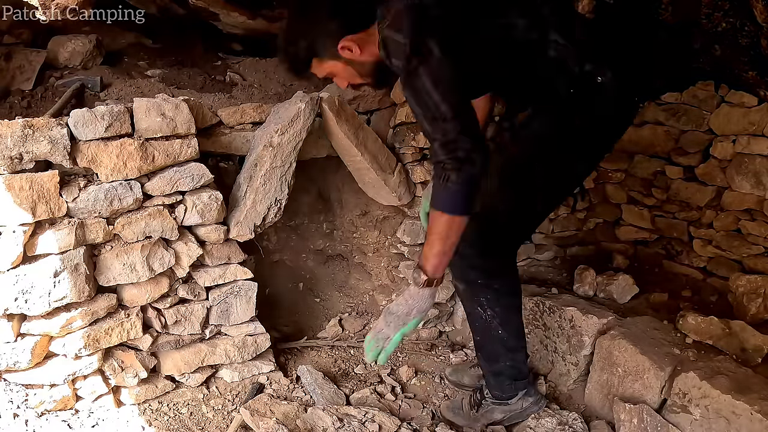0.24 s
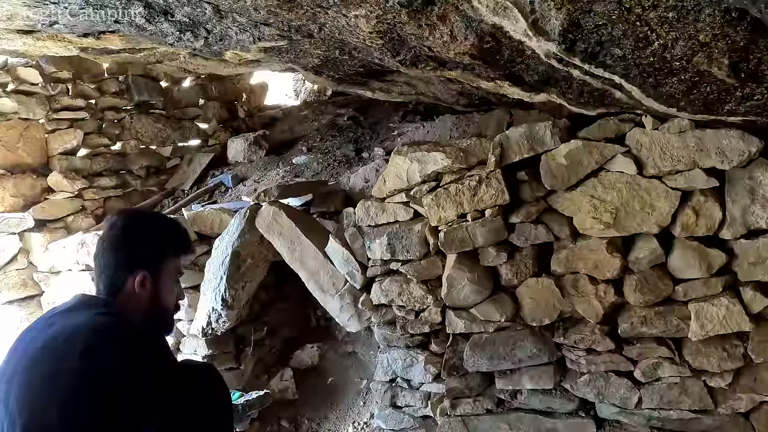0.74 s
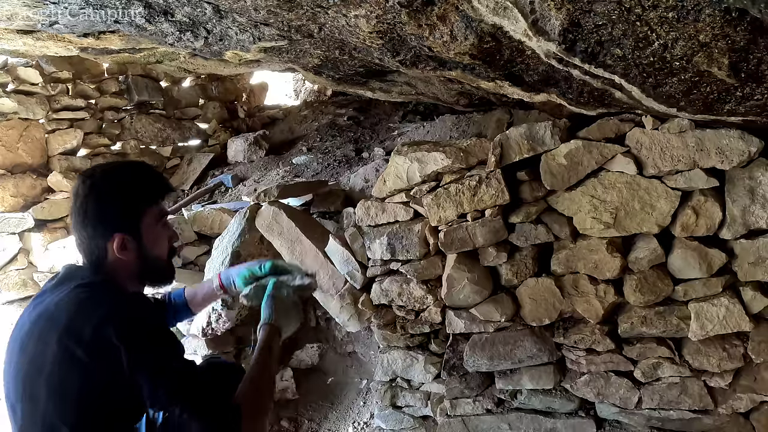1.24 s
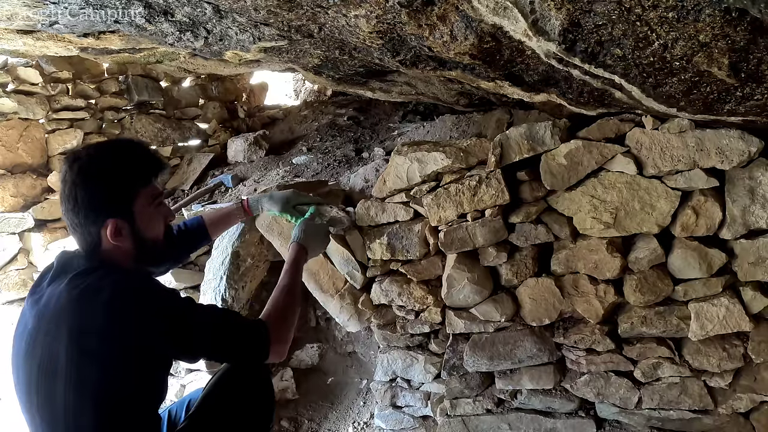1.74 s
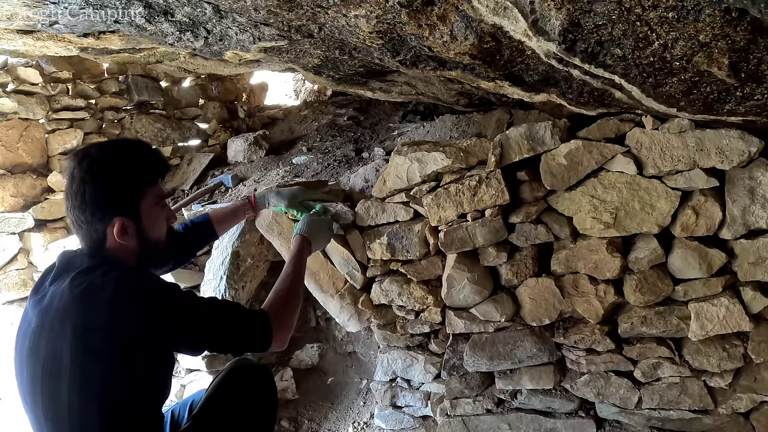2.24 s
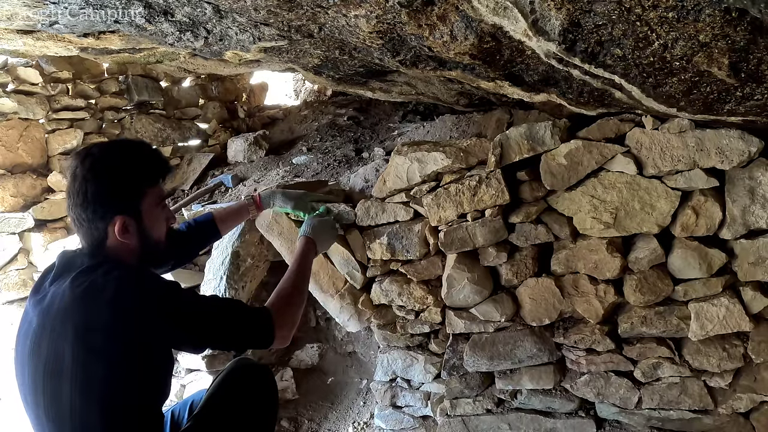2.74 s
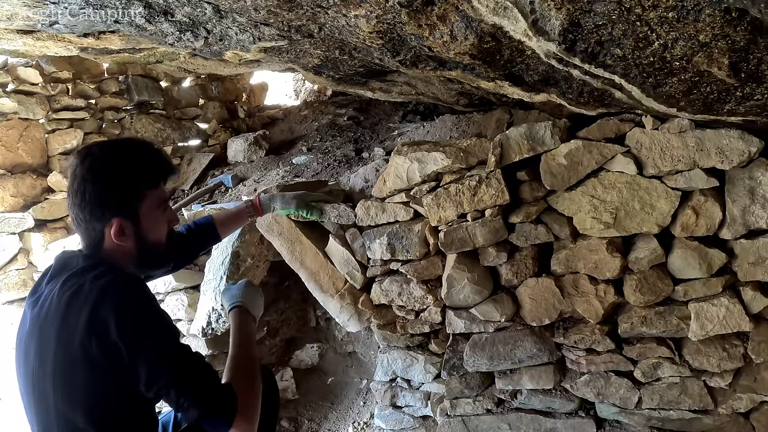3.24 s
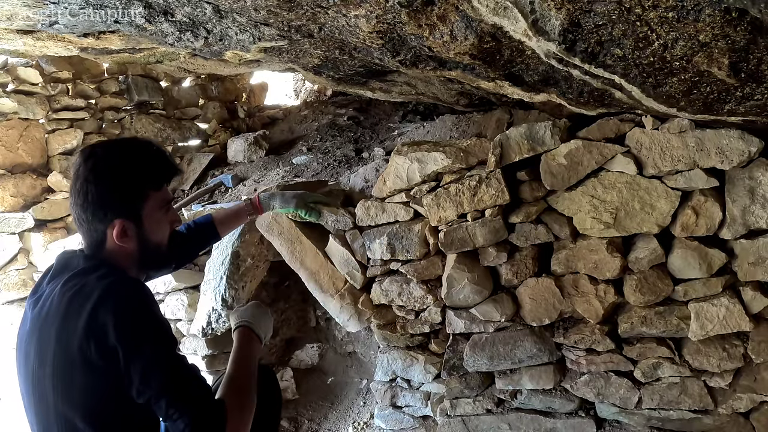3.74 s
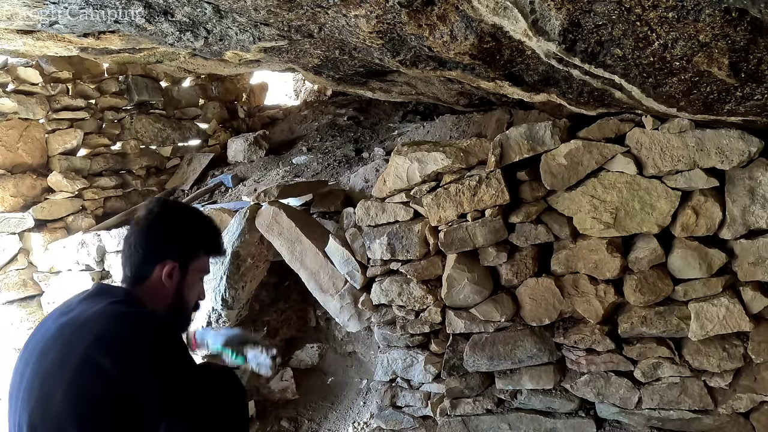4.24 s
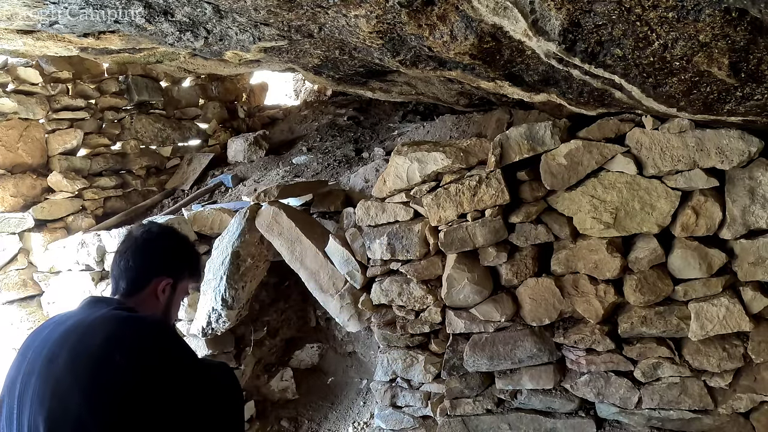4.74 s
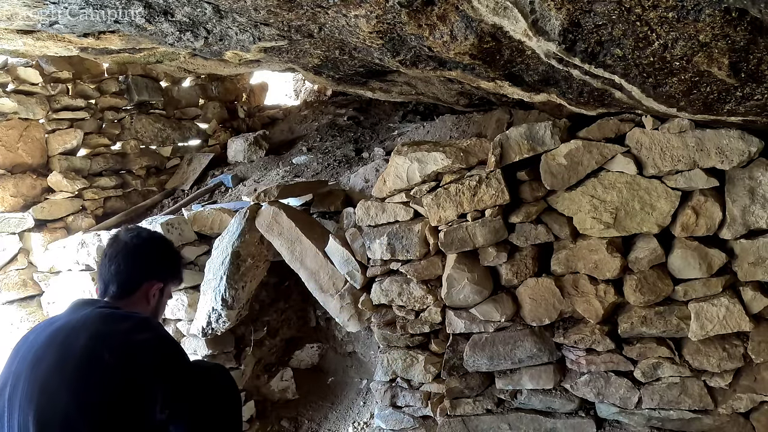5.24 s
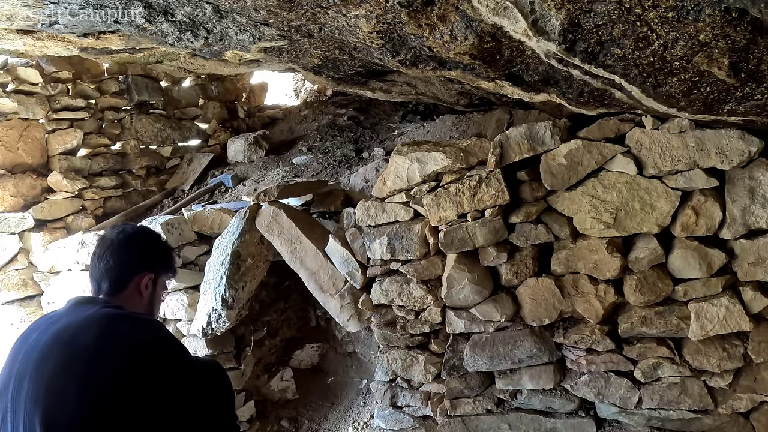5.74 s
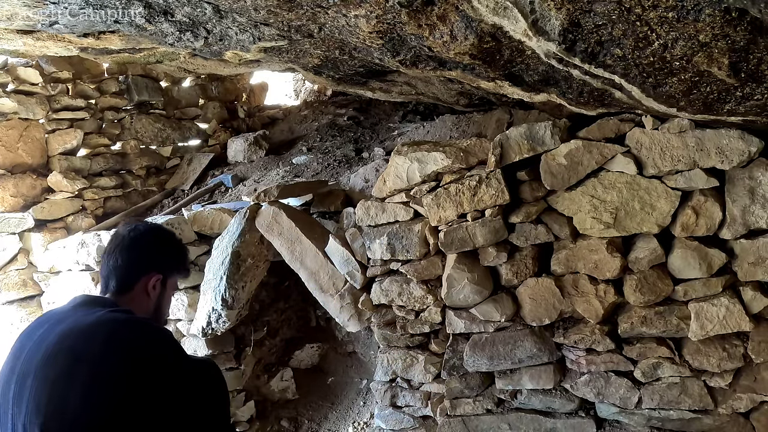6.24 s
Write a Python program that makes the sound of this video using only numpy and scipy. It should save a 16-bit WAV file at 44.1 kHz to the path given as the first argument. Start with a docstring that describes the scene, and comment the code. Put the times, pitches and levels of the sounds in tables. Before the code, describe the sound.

Stones are handled a couple of metres away under a low rock overhang, with very little echo. For the first 0.7 seconds loose stones clack and thud, with one bright, sharp clack at 0.3 seconds. Two small dry pops sound right at the microphone at about 0.6 and 1.2 seconds, and a much louder one at 1.9. Between them and afterwards, sleeves and gloves rustle faintly, a boot scuffs and grit ticks. A few light knocks come around 3.6 seconds. From 4.1 the rubbing grows, and from 4.8 to 5.1 a flat slab knocks and rocks while a thin flake chatters with high clinks. The slab strikes hard at 5.8 and 5.9 seconds, ringing briefly, then lands with a firm clack and thud at 6.3. Soft puffs of air rumble on the microphone, mostly at the start and near the end.

```python
"""Loose stones clack and thud as they are picked up and set into a dry wall under a low rock overhang,
a couple of metres away. Later a flat slab knocks, rings and lands hard, and a thin flake chatters.
Each impact excites damped modes of the stone, its weight drives the ground, and the rock scatters
the sound back. Friction makes sleeves and gloves rustle and a boot scuff in grit; air rumbles
softly through the shelter, and three dry pops sound very close."""
import sys
import numpy as np
from scipy import signal
from scipy.fft import rfft, irfft
from scipy.io import wavfile
from scipy.ndimage import uniform_filter1d

SR = 44100
rng = np.random.default_rng(int(sys.argv[2]) if len(sys.argv) > 2 else 0)


def generate_wav(sig):
    """Save sig (samples, or channels by samples) to the path in sys.argv[1] as 16-bit PCM at SR."""
    pcm = np.round(np.clip(np.atleast_2d(sig).T, -1, 1) * 32767).astype(np.int16)
    wavfile.write(sys.argv[1], SR, pcm)


N = 285327
BLOW_S = np.arange(-256, 16128) / SR  # time axis of one impact, with contact at zero
AGE_S = np.maximum(BLOW_S, 0)

def undb(db):
    """Amplitude ratio of a level in decibels."""
    return 10 ** (np.asarray(db) / 20)

def unit(x):
    """Normalisation to an rms of 1."""
    return x / np.sqrt(np.mean(x ** 2))

def tint(x, points):
    """Spectral shaping by a curve through (frequency_hz, gain_db) points."""
    hz, db = np.transpose(points)
    f = np.fft.rfftfreq(x.shape[-1], 1 / SR)
    gain = undb(np.interp(np.log(f + 1), np.log(hz), db))
    return irfft(rfft(x) * gain, x.shape[-1])

def resonance(hz, db, width):
    """A broad resonance as spectral points; its width is a share of its pitch."""
    return [(hz / (1 + width), 0), (hz, db), (hz * (1 + width), 0)]

def noise(size, points, side_db):
    """Partly coherent stereo noise: the weaker the side signal, the more alike the ears."""
    mid, side = tint(rng.standard_normal((2, size)), points)
    return unit(mid + undb(side_db) * side * np.array([[1], [-1]]))

def wander(rate_hz):
    """Smooth random modulation with an rms of 1."""
    hold = int(SR / rate_hz)
    steps = rng.standard_normal(N)[np.arange(N) // hold]
    return unit(uniform_filter1d(steps, hold))

def fade(t60_s):
    """Exponential damping: 60 dB in t60_s."""
    return np.exp(-np.log(1000) * AGE_S / max(t60_s, .004))

def swell(rise_s):
    """Onset of a contact whose force builds over a finite time."""
    return 1 - np.exp(-(AGE_S / rise_s) ** 2)

def band_db(x, low_hz, high_hz):
    """Band level of an impact, its energy spread over 25 ms."""
    f = np.fft.rfftfreq(len(BLOW_S), 1 / SR)
    band = rfft(x.mean(axis=0))[(f > low_hz) & (f < high_hz)]
    energy = 2 * np.sum(np.abs(band) ** 2) / len(BLOW_S)
    return 10 * np.log10(energy / (.025 * SR))

def add(track, start_s, blow):
    """Superposition of one impact on the track."""
    start = int((start_s + BLOW_S[0]) * SR)
    a, b = max(start, 0), min(start + len(BLOW_S), N)
    track[:, a:b] += blow[:, a - start:b - start]

def movement(rows, attack_s, release_s, rest_db, arch_db=0):
    """Incoherent sources add in power: movements over a resting level, arch_db weaker at each end."""
    t = np.arange(N) / SR
    power = undb(rest_db) ** 2
    for start_s, length_s, db in rows:
        onset = np.clip((t - start_s) / attack_s, 0, 1)
        decay = np.exp(-np.maximum(t - start_s - length_s, 0) / release_s)
        arch = (2 * np.clip((t - start_s) / length_s, 0, 1) - 1) ** 2
        power = power + (undb(db - arch_db * arch) * onset * decay) ** 2
    return np.sqrt(power)

# spectrum of moving air: frequency_hz, gain_db
AIR_SPECTRUM = [(10, -14), (30, 2), (40, -2.5), (55, -21), (100, -22.5), (300, -67)]
# puffs of air: start_s, length_s, relative_level_db
AIR_PUFFS = [(0.07, 0.06, -33.5), (0.58, 0.24, -58.5), (2.02, 0.85, -61), (3.55, 0.28, -53),
             (4.18, 0.43, -55), (4.72, 0.16, -53), (5.48, 0.57, -59), (5.92, 0.18, -42), (6.1, 0.33, -46)]

def air():
    """Turbulence: puffs of air on the microphone make a low rumble."""
    puffs = movement(AIR_PUFFS, attack_s=0.017, release_s=0.029, rest_db=-71)
    return noise(N, AIR_SPECTRUM, side_db=-12.5) * puffs * undb(-1)

# response of the hollow ground: frequency_hz, gain_db
HOLLOW_SPECTRUM = [(60, -5), (110, -20.5), (165, 5), (210, -1), (290, -9.5), (500, -18.5), (900, -27.5),
                   (2000, -53.5)]
# shifts of weight: start_s, length_s, relative_level_db
WEIGHT_SHIFTS = [(0.06, 0.16, -61.5), (0.48, 0.15, -54), (1.03, 0.036, -58), (2.0, 0.014, -57.5),
                 (2.48, 0.15, -63.5), (2.77, 0.02, -62.5), (3.54, 0.19, -59.5), (4.2, 0.2, -67.5),
                 (4.44, 0.04, -63), (4.78, 0.23, -56.5), (5.27, 0.018, -62.5), (5.42, 0.079, -56.5),
                 (5.52, 0.52, -60), (6.15, 0.35, -64)]

def boots():
    """Forced vibration: shuffling feet drive the low resonance of the hollow ground."""
    shifts = movement(WEIGHT_SHIFTS, attack_s=0.015, release_s=0.052, rest_db=-73.5)
    return noise(N, HOLLOW_SPECTRUM, side_db=-5.0) * shifts * undb(2.5 + 3 * wander(24))

def grit(grains_per_s=220, size_spread_db=10.5):
    """Stick-slip friction: grains break loose in bursts, each with a tiny crack."""
    signs = rng.choice([-1, 1], N)
    sizes = undb(size_spread_db * np.minimum(rng.exponential(size=N), 3))
    slip = undb(3.8 * wander(22))
    grains = (rng.random(N) < slip * grains_per_s / SR) * signs * sizes
    return unit(signal.fftconvolve(grains[None], crack(0.017), axes=1)[:, :N])

# spectra of rubbing cloth and of its fine hiss: frequency_hz, gain_db
CLOTH_SPECTRUM = [(300, -28), (880, -10.5), (1120, 3), (1280, 2.5), (1600, -0.5), (1900, -5), (2450, -5.5),
                  (3500, -8), (5000, -16), (9000, -30.5), (15000, -57)]
HISS_SPECTRUM = [(500, -3.5), (3500, -13.5), (5200, 1), (7800, 2), (8600, -2), (9400, -16.5),
                 (12000, -15.5), (15500, -45.5)]
# sleeve, glove or boot sliding over stone: start_s, length_s, relative_rub_db, relative_hiss_db
FRICTION_STROKES = [(0.0, 0.24, -60, -59), (0.453, 0.16, -63, -74), (0.799, 0.095, -69, -67.5),
                    (1.014, 0.07, -62.5, -63), (1.073, 0.091, -63.5, -71), (1.175, 0.32, -58, -68),
                    (1.356, 0.066, -56, -65), (1.441, 0.3, -66, -68.5), (1.86, 0.3, -66.5, -73),
                    (1.973, 0.12, -65, -72), (2.453, 0.54, -74.5, -73), (2.913, 0.051, -65.5, -63),
                    (3.465, 0.11, -65, -88), (3.808, 0.084, -70.5, -64), (3.963, 0.64, -65.5, -67),
                    (4.072, 0.13, -57.5, -67), (4.177, 0.036, -52, -74), (4.354, 0.085, -60.5, -76),
                    (4.497, 0.1, -60, -58), (4.581, 0.069, -55.5, -63), (4.709, 0.31, -56, -64.5),
                    (5.072, 0.1, -60, -67.5), (5.249, 0.12, -58.5, -63.5), (5.433, 0.076, -55, -62),
                    (5.533, 0.095, -57.5, -68), (5.657, 0.1, -55.5, -58.5), (5.827, 0.32, -60, -68.5),
                    (6.162, 0.24, -59.5, -64)]

def rustle():
    """Friction noise grows with sliding speed, so each gritty stroke is loudest midway."""
    strokes = np.array(FRICTION_STROKES)
    shape = dict(attack_s=0.019, release_s=0.039, arch_db=4)
    rub_gain = movement(strokes[:, [0, 1, 2]], rest_db=-77.5, **shape)
    hiss_gain = movement(strokes[:, [0, 1, 3]], rest_db=-76, **shape)
    crackle = undb(-7) * grit()
    cloth = noise(N, CLOTH_SPECTRUM, side_db=-8.5) * undb(2.63 * wander(45))
    hiss = noise(N, HISS_SPECTRUM, side_db=-12.5) * undb(1.75 * wander(45))
    return undb(-1.5) * ((cloth + crackle) * rub_gain + hiss * hiss_gain)

# the glove catching on rough stone: start_s, relative_level_db
GLOVE_SNAGS = [(1.042, -57), (1.097, -56), (1.235, -64), (2.133, -62), (2.954, -59), (4.093, -61),
               (4.211, -62), (5.481, -56), (5.596, -61)]

def scratches(rise_s=0.0022, t60_s=0.037):
    """A single stick-slip event: the glove snags and slips free with a dry rasp."""
    out = np.zeros((2, N))
    for start_s, db in GLOVE_SNAGS:
        hiss = noise(len(BLOW_S), HISS_SPECTRUM, side_db=-26)
        scrape = undb(-2) * noise(len(BLOW_S), STONE_SPECTRUM, side_db=-16)
        add(out, start_s, undb(db + 4) * (hiss + scrape) * swell(rise_s) * fade(t60_s))
    return out

# dry pops right at the microphone: start_s, relative_level_db, snap_s
CLOSE_POPS = [(0.623, -34.5, 0.00015), (1.221, -38, 0.0011), (1.9275, -17.5, 0.00013)]

def pops(sag_hz=150, swing_hz=38):
    """A pressure transient with no echo: a snap, a quick sag and a slow swing back."""
    out = np.zeros((2, N))
    sag = undb(-1) * np.sin(2 * np.pi * sag_hz * AGE_S) * fade(0.012) * swell(0.0022)
    swing = undb(-14) * np.cos(2 * np.pi * swing_hz * AGE_S) * fade(0.11) * swell(0.0022)
    pan_db = np.array([[-1], [1]])
    for start_s, db, snap_s in CLOSE_POPS:
        snap = AGE_S / snap_s * np.exp(1 - AGE_S / snap_s)
        pop = tint(snap - 2 * sag - swing, [(5000, 0), (14000, -22)])
        add(out, start_s, undb(db + pan_db) * pop)
    return out

# spectrum of snapping grit: frequency_hz, gain_db
CRUMB_SPECTRUM = [(3000, -33.5), (8000, 9.5), (15000, -11.5)]
# crumbs cracking under a stone: start_s, relative_level_db
CRUMB_SNAPS = [(.517, -47.5), (.653, -51), (2.623, -54.5), (2.89, -54.5), (3.248, -51), (3.857, -43),
               (5.656, -48.5), (6.318, -49)]

def crumbs(rise_s=0.00035, t60_s=0.042):
    """Brittle fracture: a crumb of grit gives way with a tiny, very bright tick."""
    out = np.zeros((2, N))
    for start_s, db in CRUMB_SNAPS:
        tick = noise(len(BLOW_S), CRUMB_SPECTRUM, side_db=-3) * swell(rise_s) * fade(t60_s)
        add(out, start_s, undb(db - 8) * tick)
    return out

def clink(hz, db, t60_s, spread, rise_s):
    """Beating: five close modes interfere as they decay, over a shorter rasp of the rough faces."""
    detune, phase = rng.uniform(-0.71, 1, (2, 5, 1))
    modes = np.sin(2 * np.pi * (hz * (1 + spread * detune) * AGE_S + phase))
    tone = unit(modes.sum(axis=0, keepdims=True))
    rasp = unit(tint(rng.standard_normal((1, len(BLOW_S))), resonance(hz, 40, .5)))
    x = (tone * fade(t60_s) + undb(-1) * rasp * fade(t60_s * .75)) * swell(rise_s)
    return x * undb(db - band_db(x, 0, SR))

# stones and splinters that lie free: start_s, pitch_hz, level_db, t60_s
FREE_STONE_RINGS = [(0.306, 1814, -41.5, 0.069), (.305, 9740, -41, 0.055), (3.69, 517, -48.5, 0.049),
                    (5.9136, 10300, -57.5, 0.11)]

def free_stones():
    """Free vibration: an unclamped stone rings on for a moment after a knock."""
    out = np.zeros((2, N))
    for start_s, hz, db, t60_s in FREE_STONE_RINGS:
        add(out, start_s, clink(hz, db, t60_s, spread=.045, rise_s=0.00051))
    return out

# two modes of a thin hard flake: pitch_hz, t60_s
FLAKE_RESONANCES = [(5110, 0.09), (6600, 0.074)]
# slips and blows as stones are wedged in: start_s, lower_mode_db, upper_mode_db
FLAKE_CHATTER = [(2.430, -59.5, -70.5), (2.457, -76, -90.5), (2.478, -82, -73), (2.502, -82, -90),
                 (3.489, -74.5, -87), (3.508, -70, -78.5), (3.538, -52.5, -57.5), (3.590, -68, -77),
                 (3.622, -69, -81), (3.667, -60.5, -67), (4.780, -42, -51), (4.841, -50, -43),
                 (4.899, -58, -56), (5.068, -40.5, -40.5), (5.127, -60, -54), (5.788, -43.5, -43),
                 (5.914, -39.5, -55), (6.275, -78, -66), (6.296, -55, -58), (6.342, -46, -39.5)]

def flake():
    """Selective excitation: where the flake is pinched decides which mode speaks."""
    out = np.zeros((2, N))
    for start_s, *levels_db in FLAKE_CHATTER:
        for (hz, t60_s), db in zip(FLAKE_RESONANCES, levels_db):
            add(out, start_s, clink(hz, db, t60_s, spread=.009, rise_s=0.0015))
    return out

# dense modes of rough stone: frequency_hz, gain_db
STONE_SPECTRUM = [(120, -30), (350, -14), (700, -5), (1050, -3.5), (1900, 2), (3200, 0), (4500, -4.5),
                  (6000, -6), (7700, -5), (9100, -18), (10300, -24), (11600, -27.5), (14200, -31.5),
                  (15500, -44.5)]

def crack(t60_s, rise_s=0.0033, tail_cut_db=0):
    """Modal overlap: dense, damped modes merge into noise, which the wall and rock roof scatter."""
    direct = noise(len(BLOW_S), STONE_SPECTRUM, side_db=-13.0) * swell(rise_s) * fade(t60_s)
    scatter = noise(len(BLOW_S), STONE_SPECTRUM, side_db=-6.5) * swell(0.01)
    tail = undb(-19) * fade(0.14) + undb(-44) * fade(0.46)  # near and far reflections
    return direct + scatter * tail * undb(-tail_cut_db)

def ring(modes, rise_s, detune_share=.009, scatter_db=2.0):
    """Normal modes are damped sinusoids; grip and point of contact vary them from blow to blow."""
    out = 0
    for hz, db, t60_s in modes:
        detune, loss, phase = rng.standard_normal(3)
        tone = np.sin(2 * np.pi * (hz * (1 + detune_share * detune) * AGE_S + phase))
        out = out + undb(db - scatter_db * loss) * tone * fade(t60_s)
    return out * swell(rise_s)

def contact(x, body_db, clack_db, tick_db):
    """Contact sets the band levels: a blunt face drives the low modes, a sharp edge the high ones."""
    bands = [(700, 2000, body_db), (2000, 4500, clack_db), (4500, 10000, tick_db)]
    for _ in range(2):  # twice, since each band's gain spills into its neighbours
        x = tint(x, [(np.sqrt(lo * hi), db - band_db(x, lo, hi)) for lo, hi, db in bands])
    return x

# modes of the ground under the stones: pitch_ratio, gain_db, t60_s
GROUND_RESONANCES = [(.74, -5, 0.13), (0.981, -25, 0.063), (1.261, 4, 0.059)]

def thud(db, hz, cavity_hz=178, earth_hz=78):
    """The landing weight drives the ground modes and the cavity resonance under the rock."""
    load_s = AGE_S - .007  # the weight peaks just after the contact
    ground = sum(undb(gain_db) * np.cos(2 * np.pi * hz * ratio * load_s) * fade(t60_s)
                 for ratio, gain_db, t60_s in GROUND_RESONANCES)
    cavity = undb(-17) * np.sin(2 * np.pi * (cavity_hz * AGE_S + rng.random())) * fade(0.22)
    boom = undb(-17) * noise(len(BLOW_S), HOLLOW_SPECTRUM, side_db=-21.5) * fade(0.18)
    earth = undb(-10) * np.cos(2 * np.pi * earth_hz * load_s) * fade(0.0975)
    x = tint((ground + earth + cavity + boom) * swell(0.0061), [(45, -10), (100, 0)])
    return x * undb(db - band_db(x, 40, 900))

# modes of a small stone: pitch_ratio, gain_db, t60_s
SMALL_STONE_RESONANCES = [(.83, -6.5, 0.045), (0.998, -2, 0.034), (1.128, -8.5, 0.02133)]
# loose stones and chips landing: start_s, thud_db, body_db, clack_db, tick_db, t60_s, pitch_hz
STONE_IMPACTS = [(0.003, -57.5, -46, -54.5, -50.5, 0.27, 1110), (0.038, -50, -49, -49, -42, 0.35, 8100),
                 (0.065, -41, -40, -67, -62, 0.2, 480), (0.078, -41, -39.5, -44.5, -46, 0.12, 1106),
                 (0.0906, -44, -60, -40.5, -36.5, 0.062, 7470), (0.163, -76, -51, -53.5, -48.5, 0.18, 6960),
                 (0.3051, -38, -43, -26, -33.5, 0.06, 3297), (0.323, -38.5, -51.5, -50, -53, 0.076, 800),
                 (0.431, -47.5, -55, -68, -67.5, 0.22, 753), (0.458, -50, -36.5, -43, -52.5, 0.051, 1746),
                 (0.492, -50, -49.5, -59, -72, 0.089, 895), (0.516, -75, -62, -54.5, -62, 0.07, 3620),
                 (0.551, -44.5, -50.5, -60, -81, 0.056, 964), (0.565, -57, -57, -66, -78, 0.06, 3640),
                 (0.576, -49.5, -67, -56, -62, 0.12, 3740), (0.652, -58, -68.5, -57, -59.5, 0.049, 2980),
                 (0.687, -46.5, -46.5, -51.5, -67, 0.073, 1274), (0.815, -80, -76, -81, -57, 0.13, 6750),
                 (1.023, -61, -61, -63, -76, 0.074, 1900), (1.991, -61, -57, -63.5, -63, 0.15, 1120),
                 (2.206, -56.5, -59, -85.5, -86.5, 0.23, 547), (2.378, -73, -105, -68.5, -55, 0.093, 6870),
                 (2.421, -65.5, -71.5, -75, -57, 0.1, 7100), (2.733, -81, -56, -62, -60.5, 0.31, 1350),
                 (2.779, -51.5, -61, -77, -69, 0.049, 434), (3.067, -89, -84.5, -80, -63.5, 0.14, 5210),
                 (3.248, -87, -102.5, -58, -61, 0.14, 3670), (3.665, -40, -41.5, -56.5, -75.5, 0.049, 1140),
                 (3.692, -48, -54, -72, -86, 0.056, 910), (3.857, -66, -85, -70.5, -67, 0.13, 8700),
                 (4.943, -48.5, -50, -65, -72, 0.09, 1820), (4.985, -47, -52.5, -56, -63, 0.1, 690),
                 (5.41, -53.5, -65, -63, -62.5, 0.21, 5470), (5.508, -58, -53.5, -64, -72, 0.073, 1780),
                 (5.677, -47, -46.5, -59.5, -72, 0.14, 1640), (6.3431, -72, -70, -54, -32.5, 0.073, 7260)]

def loose_stones(rise_s=0.0003, ground_hz=175.2, scatter_octaves=0.17):
    """Impulse excitation: each stone grazes, clacks at its own resonance and thuds into the ground."""
    out = np.zeros((2, N))
    for start_s, thud_db, body_db, clack_db, tick_db, t60_s, pitch_hz in STONE_IMPACTS:
        modes = [(pitch_hz * ratio, db, decay_s) for ratio, db, decay_s in SMALL_STONE_RESONANCES]
        burst = tint(crack(t60_s, rise_s), resonance(pitch_hz, db=7, width=0.46))
        ringing = undb(-1) * ring(modes, rise_s)
        clack = contact(burst + ringing, body_db, clack_db, tick_db)
        add(out, start_s, clack)
        add(out, start_s - 0.006, undb(-33) * clack)  # the graze
        thud_hz = ground_hz * 2 ** (scatter_octaves * rng.standard_normal())
        add(out, start_s + .003, thud(thud_db, thud_hz))
    return out

# modes of the flat slab: pitch_hz, gain_db, t60_s
SLAB_RESONANCES = [(996, 10, 0.049), (1270, 4.5, 0.054), (1418, 8, 0.056), (1638, 7, 0.042),
                   (1844, 3.5, 0.079), (2403, -5, 0.032), (2570, 15, 0.031), (2640, -14.5, 0.11),
                   (4960, 10, 0.044), (7860, 7, 0.05)]
# the slab landing and rocking:
# start_s, thud_db, thud_hz, body_db, clack_db, tick_db, ring_gain_db, peak_hz, rise_s
SLAB_IMPACTS = [(3.538, -45, 147, -44, -81.5, -62, -31, 1280, 0.0003),
                (3.575, -49, 129, -48.5, -53, -64.5, -26.5, 1000, 0.00042),
                (3.679, -54, 94, -55, -80, -87, -13, 995, .002),
                (4.78, -32.5, 131, -36.5, -48, -41.5, -8, 990, 0.0011),
                (4.801, -39, 111, -29.5, -51.5, -65, -9, 980, 0.0018),
                (4.831, -61, 179, -38.5, -76, -79, -27, 980, 0.0021),
                (4.843, -42.5, 151, -36, -54, -56.5, -17, 970, 0.0011),
                (4.884, -49, 139, -52, -76, -66, -14, 980, 0.0024),
                (4.895, -41, 105, -32.5, -53.5, -57.5, -10.5, 940, 0.0019),
                (4.963, -41.5, 129, -48, -60, -63, -13, 1000, 0.0012),
                (5.067, -35.5, 213, -35.5, -38.5, -47.5, -14.5, 1200, 0.0033),
                (5.127, -59, 194, -61, -53.5, -60, -19, 3200, 0.00038),
                (5.788, -32, 144, -20.5, -34, -49, -6, 1420, 0.002),
                (5.798, -73, 157, -39.5, -38, -36, -36, 2170, 0.0022),
                (5.818, -39.5, 125, -41.5, -51, -51, -12, 1440, 0.0088),
                (5.88, -39.5, 134, -46, -67, -81, -12, 990, 0.0021),
                (5.9134, -24.5, 135.7, -21, -24.5, -42, -12, 1840, 0.0016),
                (5.936, -40, 153, -40.5, -48, -59.5, -24, 1770, 0.0023),
                (5.973, -53, 200, -50, -68, -69, -15, 1000, 0.0016),
                (6.153, -44, 143, -39.5, -56.5, -71, -4, 1500, 0.00097),
                (6.206, -53, 143, -51, -89, -81, -4, 1010, 0.0013),
                (6.228, -57.5, 116, -56, -77, -63.5, -12, 980, 0.0013),
                (6.285, -47.5, 154, -41.5, -72, -67, 7, 1000, 0.0022),
                (6.309, -45, 157, -40, -54, -57, -12, 1290, 0.0011),
                (6.342, -20, 122, -25, -21.5, -37.5, -51, 2920, 0.0018),
                (6.372, -39.5, 105.1, -48.5, -55, -60, -15.5, 1390, 0.0015)]

def slab(firm_db=-30, light_t60_s=0.058, db_per_halving=29, graze_limit_db=-47.5):
    """Contact damping: a firm blow stops dead, a light one grinds on; the ring follows the crack."""
    out = np.zeros((2, N))
    for start_s, thud_db, thud_hz, body_db, clack_db, tick_db, ring_db, peak_hz, rise_s in SLAB_IMPACTS:
        t60_s = light_t60_s * 2 ** (-max(body_db - firm_db, 0) / db_per_halving)
        tail_cut_db = 0.2 * max(thud_db - firm_db, 0)  # a heavy landing pins the slab
        burst = tint(crack(t60_s, rise_s, tail_cut_db), resonance(peak_hz, db=7, width=0.59))
        ringing = undb(ring_db) * ring(SLAB_RESONANCES, rise_s * 1.75)
        knock = contact(burst + ringing, body_db, clack_db, tick_db)
        add(out, start_s, knock + thud(thud_db, thud_hz))
        # the slab first grazes its seat, lightly however hard the blow
        graze = contact(crack(0.15, rise_s=0.014), body_db, clack_db - 5, tick_db - 5)
        add(out, start_s - 0.016, undb(min(-17, graze_limit_db - body_db)) * graze)
    return out

def scene():
    """Superposition of the stones, the pops, the builder's movement and the air."""
    stones = slab() + loose_stones() + flake() + free_stones() + crumbs()
    return stones + pops() + rustle() + boots() + air() + scratches()

# response of the microphone: frequency_hz, gain_db
MICROPHONE_RESPONSE = [(9000, -0.5), (10400, 2), (12000, -4.5), (14000, -7), (15300, -8)]
# its two ports: frequency_hz, left_minus_right_db, left_lag_rad
PORT_RESPONSE = [(60, -1, 0.06), (201.3, -0.5, .1), (400, -4, 0.0097), (987, 2.5, 0.1337), (1550, 1, 0.65),
                 (3143, 1.5, 0.93), (4870, 0, 0.37), (8100, 1.5, 0.54), (15000, 15.5, 0.94)]

def record(dry, cutoff_hz=15300):
    """Stereo cues of level and phase: the balance varies with pitch, the left lags; the top is cut."""
    hz, balance_db, lag_rad = np.transpose(PORT_RESPONSE)
    log_f = np.log(np.fft.rfftfreq(N, 1 / SR) + 1)
    gain = undb(np.interp(log_f, np.log(hz), balance_db) / 2)
    left = gain * np.exp(-.5j * np.interp(log_f, np.log(hz), lag_rad))
    spectrum = rfft(tint(dry, MICROPHONE_RESPONSE))
    ports = irfft(spectrum * np.array([left, 1 / left]), N)
    lowpass = signal.ellip(8, .2, 70, cutoff_hz, fs=SR, output="sos")
    return signal.sosfilt(lowpass, ports)

dry = scene()
out = record(dry)
generate_wav(out)
```